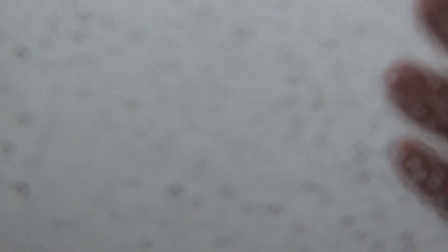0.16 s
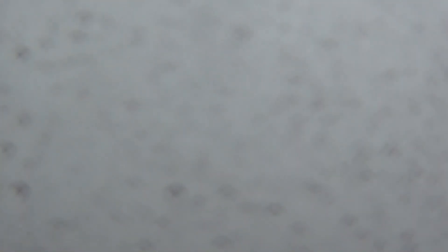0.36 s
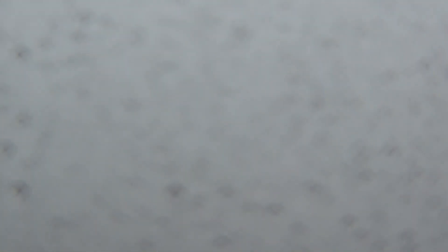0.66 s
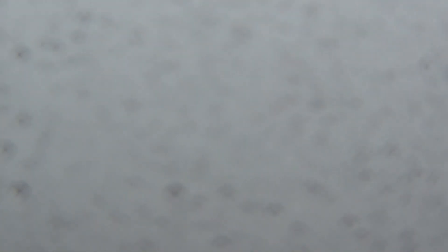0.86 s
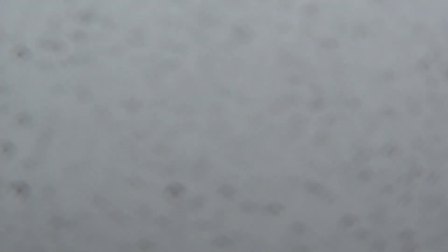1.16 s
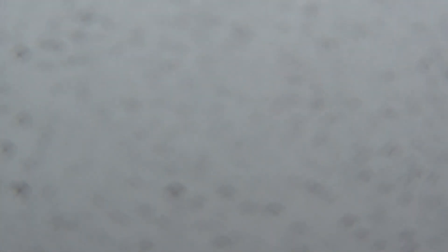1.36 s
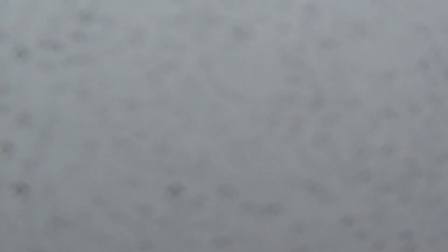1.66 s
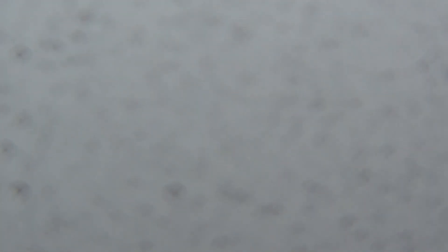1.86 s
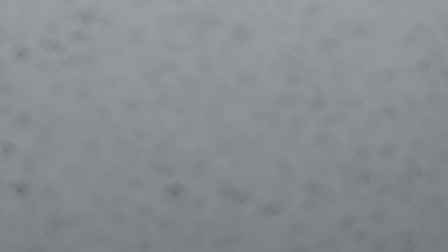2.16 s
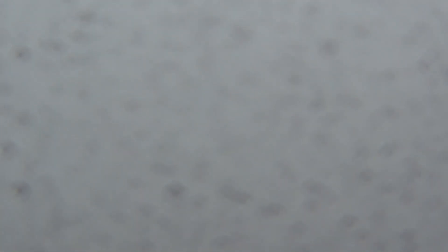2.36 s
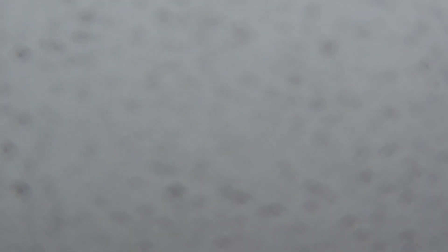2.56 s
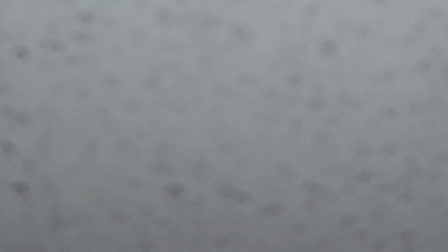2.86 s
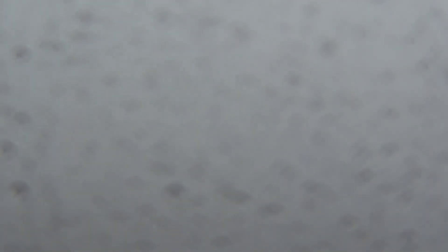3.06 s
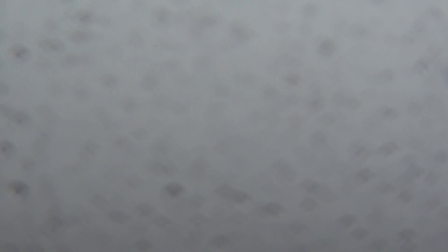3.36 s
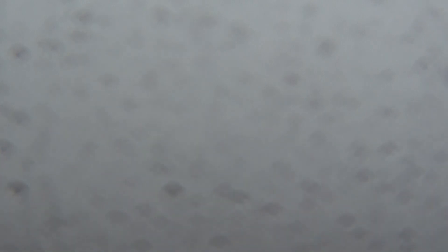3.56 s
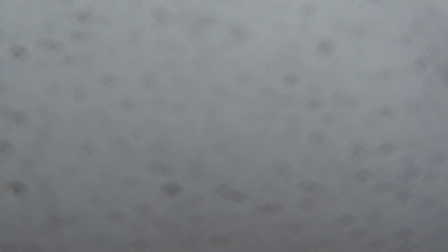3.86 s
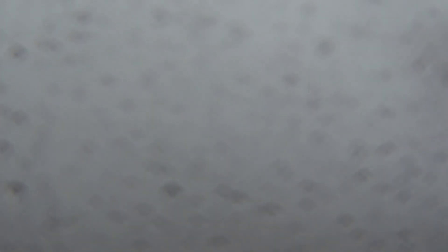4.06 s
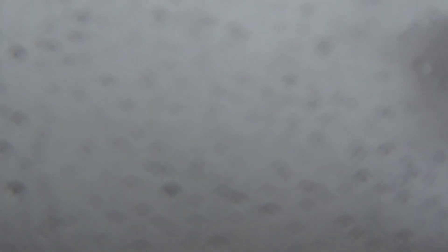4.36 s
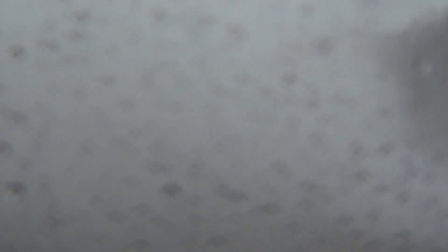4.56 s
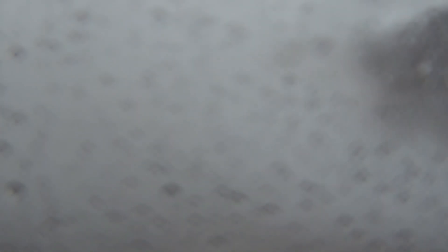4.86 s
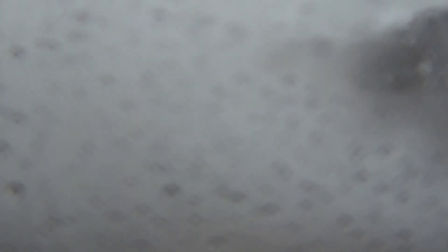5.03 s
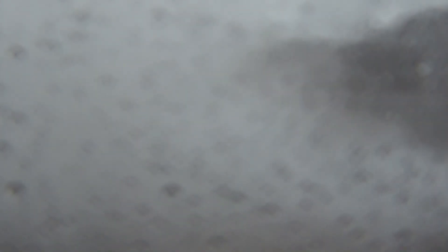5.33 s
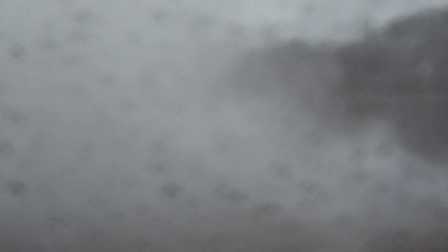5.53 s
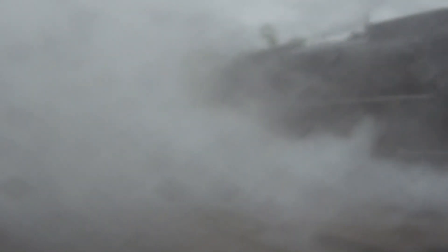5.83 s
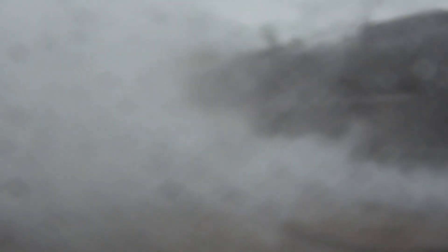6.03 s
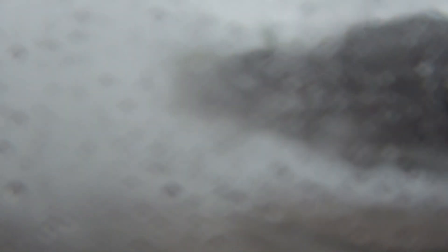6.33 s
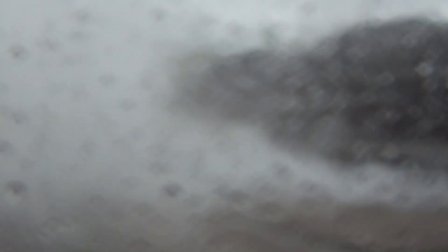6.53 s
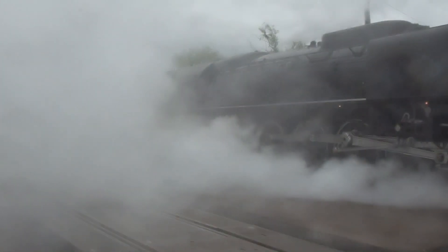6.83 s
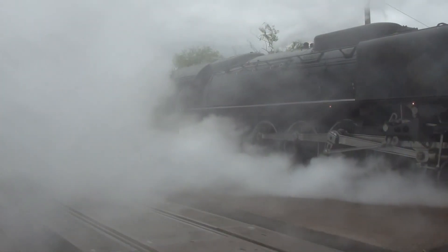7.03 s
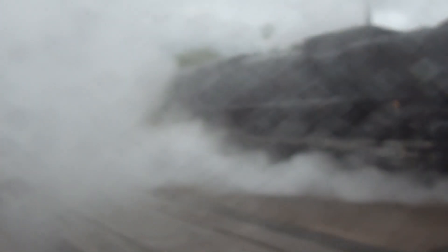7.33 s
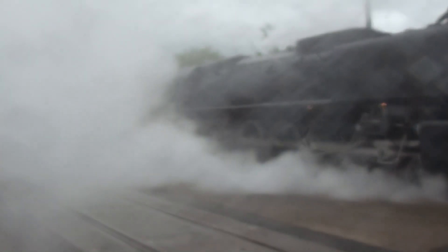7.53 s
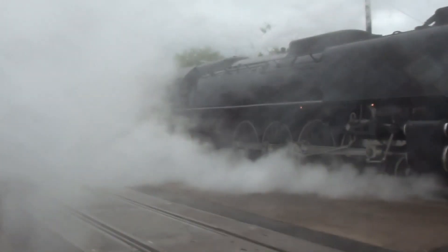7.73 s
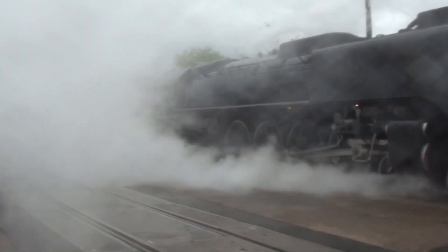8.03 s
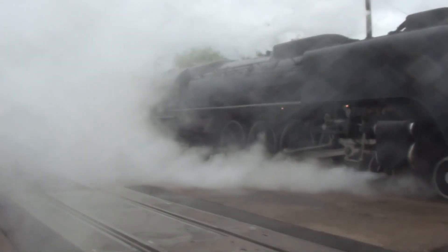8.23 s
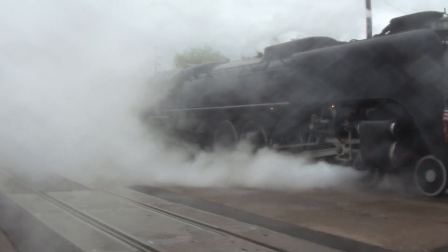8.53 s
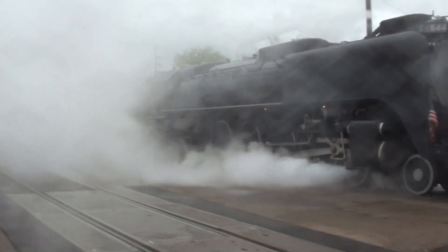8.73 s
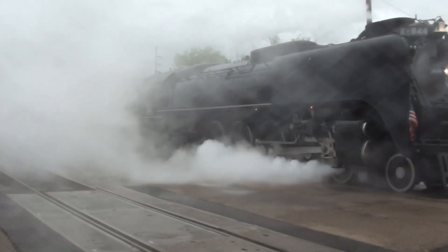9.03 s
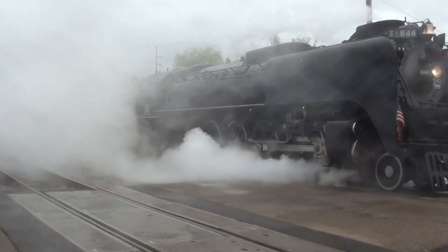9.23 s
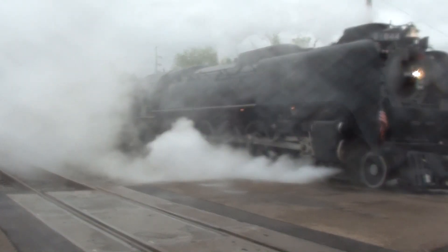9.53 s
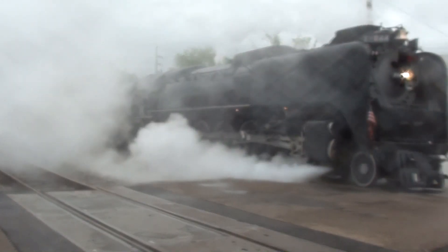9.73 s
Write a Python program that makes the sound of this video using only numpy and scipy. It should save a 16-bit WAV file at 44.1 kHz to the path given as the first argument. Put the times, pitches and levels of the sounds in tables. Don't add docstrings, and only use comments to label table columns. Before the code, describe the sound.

A continuous wall of steam hiss, bright and slightly hollow from ground reflections, fills a close outdoor stereo microphone. It snaps off for a moment, returns sharply, then weaker, and sags away. In the quiet gap a high whine swells, a small distant bell rings and metal knocks dully over low rumble. Steam swells back, dips once and blows until the end.

```python
import sys
import numpy as np
from scipy import signal
from scipy.fft import rfft, irfft
from scipy.io import wavfile
from scipy.ndimage import uniform_filter1d

SR = 44100
rng = np.random.default_rng(int(sys.argv[2]) if len(sys.argv) > 2 else 0)


def output_pcm(signal):
    pcm = np.clip(np.atleast_2d(signal).T, -1, 1) * 32767
    wavfile.write(sys.argv[1], SR, np.round(pcm).astype(np.int16))


def linear_from_db(decibels):
    return 10 ** (np.asarray(decibels, float) / 20)


N = 436149
SIZE, HOP = 1024, 256


def evened(x):
    return x / np.sqrt(np.mean(x ** 2) + 1e-20)


def read(points, hz):
    f, value = np.transpose(points)
    return np.interp(np.log(hz + 1), np.log(f + 1), value)


def curve(rows, t, column):
    rows = np.array(rows)
    return np.interp(t, rows[:, 0], rows[:, column])


def swells(rows, t):
    return sum(linear_from_db(2 * db) * np.exp(-((t - s) / length) ** 2) for s, db, length in rows)


def bump(hz, centre_hz, width_hz, db):
    return linear_from_db(2 * db / (1 + ((hz - centre_hz) / width_hz) ** 2))


def eddies(shape, frames_count, bins_count):
    field = uniform_filter1d(rng.standard_normal(shape), frames_count, 0)
    return evened(uniform_filter1d(field, bins_count, 1))


def tone(hz):
    return np.sqrt(2) * np.sin(2 * np.pi * np.cumsum(hz) / SR)


def noise(gain, same, pan_db):
    a, b, c, d = rng.standard_normal((4,) + gain.shape)
    same = np.clip(same, 0, 1)
    side = linear_from_db(pan_db / 2)
    left = a + 1j * b
    right = same * left + np.sqrt(1 - same ** 2) * (c + 1j * d)
    gain = gain * 2 / np.sqrt(side ** 2 + side ** -2 + 2 * same)
    z = np.array([gain * side * left, gain / side * right])
    return signal.istft(z.transpose(0, 2, 1), nperseg=SIZE, noverlap=SIZE - HOP)[1][:, :N]


# time_s, nearness_db, left_right_db
PASS = [(0, 0, -.3), (1.1, 0, -.2), (1.6, -1, 1), (2.05, -.5, .3), (2.3, 0, -1), (2.73, 2.5, -4),
        (3.2, 1.5, -4.8), (3.6, 0, -5.3), (4.38, 2.5, -4), (5.02, -1.5, -3.3), (5.12, .3, -3.2),
        (6.2, 0, -2.5), (7.0, 0, -.5), (7.8, 0, 1), (8.1, 0, -1), (9.89, 0, -.5)]
# time_s, hiss_db, fire_roar_db
LEAKS = [(3.4, -42, -66), (4.74, -39.5, -66), (4.83, -41.5, -67), (5.9, -52, -70), (6.17, -56, -64),
         (6.5, -53.5, -69), (7.04, -55, -67), (7.6, -52.5, -65), (7.88, -53, -62), (9.2, -38.5, -59),
         (9.7, -38.5, -65)]
# time_s, roar_db
CLOUD_ROAR = [(0, -46), (1.4, -46), (1.8, -44), (2.3, -47.5), (2.8, -48), (3.2, -56), (3.7, -56),
              (4.45, -54), (4.6, -68), (6.0, -72), (8.2, -55), (8.45, -64), (9.5, -59), (9.89, -62)]
# centre_s, roar_db, length_s
GUSTS = [(.06, -39, .06), (1.1, -47, .04), (1.65, -43, .06), (7.8, -62, .15), (9.14, -51, .04),
         (9.28, -54, .05)]
# freq_hz, density_db_per_hz
ROAR = [(15, -50), (25, -25), (97, -8), (162, -1), (194, -1.5), (247, -2), (289, 1), (380, -9), (490, -39),
        (840, -120)]
# freq_hz, share
AIM = [(500, 0.031), (1200, .25), (2200, 0.82), (7200, 1.23), (9500, 0.87), (13000, 0.0051)]
SWAY_DB = .3


def steam():
    t = np.arange(N // HOP + 5) * HOP / SR
    hz = np.fft.rfftfreq(SIZE, 1 / SR)
    power, body_db, fizz_db = jets(t, hz)
    blast, opening, slack_db = valves(t)
    dulling = .35
    body_db = body_db - dulling * slack_db[:, None]

    sway_db = SWAY_DB * eddies((len(t), 1), frames_count=14, bins_count=1)[:, 0]
    flow = blast * linear_from_db(2 * curve(PASS, t, column=1) + 2 * sway_db)
    flow = flow + linear_from_db(2 * curve(LEAKS, t, column=1))
    low = opening * linear_from_db(2 * curve(CLOUD_ROAR, t, column=1))
    low = low + linear_from_db(2 * curve(LEAKS, t, column=2)) + swells(GUSTS, t)

    power = balanced(surroundings(power, t, hz), body_db, fizz_db, hz)
    roar = linear_from_db(2 * read(ROAR, hz))
    roar = roar / roar[(hz > 60) & (hz < 330)].sum()
    power = power + roar * (low / flow)[:, None]

    ripples_db = 2.3 * eddies(power.shape, frames_count=60, bins_count=2) / (1 + hz / 6000)
    billows_db = 0.7 * eddies(power.shape, frames_count=16, bins_count=12)
    flutter_db = 0.84 * eddies(power.shape, frames_count=2, bins_count=200) * (hz / 9000) ** 2
    gain = np.sqrt(power) * linear_from_db(ripples_db + billows_db + flutter_db)
    pan_db = curve(PASS, t, column=2)[:, None] * read(AIM, hz)
    hiss = noise(gain, likeness(t, hz), pan_db)
    hiss = hiss * np.sqrt(power.sum(1).mean() / np.mean(hiss.mean(0) ** 2))
    return hiss * np.interp(np.arange(N) / SR, t, np.sqrt(flow))


# freq_hz, density_db_per_hz
CLOUD = [(330, -14.5), (450, -18.5), (650, -4), (900, -0.3), (1150, -5.5), (1500, -1.5), (2200, -0.1),
         (3200, -2), (4500, -2.3), (5800, -2), (7200, -1.2), (8500, -5.5), (10000, -12.5), (12500, -22)]
NEARING = [(330, -12), (450, -15), (650, -2.5), (900, -5), (1150, -9), (1500, -1.7), (2200, -2.6),
           (3200, -1.9), (4500, -3.5), (5800, -4.1), (7200, -1.5), (8500, -6.7), (10000, -16), (12500, -24)]
NEAR = [(330, -18.9), (450, -15), (650, -6), (900, -6.5), (1150, -6), (1500, -5), (2200, -2.5), (3200, -3),
        (4500, -4.5), (5800, -5), (7200, -2.5), (8500, -8.5), (10000, -19.3), (12500, -26)]
SHARP = [(330, -13.5), (450, -16), (650, -11), (900, -9.5), (1150, -12.5), (1500, -6.5), (2200, -6.6),
         (3200, -3), (4500, -2), (5800, -0.5), (7200, 1.5), (8500, -3.5), (10000, -16.1), (12500, -23.5)]
SHARPER = [(330, -13.5), (450, -18), (650, -18.3), (900, -9), (1150, -8.7), (1500, -8.6), (2200, -8.5),
           (3200, -6), (4500, -5.5), (5800, -5), (7200, -0.3), (8500, -5.5), (10000, -14.4), (12500, -27)]
WEAK = [(330, -18), (450, -15), (650, -12), (900, -6), (1150, -5.5), (1500, -6.5), (2200, -6), (3200, -5),
        (4500, -5.5), (5800, -4.5), (7200, 0), (8500, -8.5), (10000, -13.9), (12500, -25.3)]
LEAK = [(330, -5.5), (450, -3.5), (650, -1.5), (900, 2), (1150, -4), (1500, -2.8), (2200, -1), (3200, -2.5),
        (4500, -1), (5800, -2), (7200, 2), (8500, -4.5), (10000, -12.5), (12500, -22)]
RISING = [(190, -51), (330, -20), (847, -0.5), (1020, -11), (1400, -10), (1870, -12.5), (2770, -10),
          (3760, -9.5), (4060, -9), (6800, -7), (12500, -18), (16200, -56), (22000, -120)]
FRONT = [(330, -5.5), (450, -14.5), (650, -11), (900, 0), (1150, -8.5), (1500, -4.5), (2200, -6.5),
         (3200, -3.5), (4500, -3.5), (5800, -6), (7200, -2.2), (8500, -4), (10000, -14), (12500, -21.5)]
LAST = [(330, -7.5), (450, -17.5), (650, -9), (900, -2), (1150, -11.4), (1500, -7), (2200, -8.5),
        (3200, -3.5), (4500, -2), (5800, -3.5), (7200, -2.5), (8500, -3.5), (10000, -10), (12500, -20.5)]
# ground_ms, ground_share, body_ms, body_share, fade_hz
IN_CLOUD = (2.58, .06, .62, .17, 3190)
LOW_DRAIN, LOW_DRAIN_NEAR = (.78, .57, .92, .1, 2150), (.77, .64, 1.5, .21, 3120)
HIGH_DRAIN, HIGH_DRAIN_NEAR = (1.48, .32, .78, .32, 3020), (1.42, .51, .69, .02, 1710)
FAR_DRAIN, LEAK_SIDE = (.59, .45, 1.44, .35, 2700), (1.42, .27, .72, .23, 1900)
AHEAD_RISING, AHEAD = (1.43, .3, 1.74, .1, 4500), (1.43, .63, 1.74, .11, 3600)
LEAK_AHEAD, AHEAD_LAST = (1.43, .45, 1.74, .1, 3000), (1.42, .55, 1.74, .21, 4600)
# takeover_s, over_s, colour, echoes, body_db, fizz_db (both over the hiss)
TURNS = [(-1, .1, CLOUD, IN_CLOUD, -4.2, -12), (1.4, .3, CLOUD, IN_CLOUD, -2, -12.5),
         (2.2, .4, NEARING, LOW_DRAIN, -1, -12), (2.75, .3, NEAR, LOW_DRAIN_NEAR, .2, -14.5),
         (3.15, .15, NEAR, LOW_DRAIN_NEAR, -1.3, -15.5), (3.36, .06, LEAK, LEAK_SIDE, -1.5, -17),
         (3.5, .04, SHARP, HIGH_DRAIN, -5.3, -16), (4.05, .4, SHARPER, HIGH_DRAIN_NEAR, -7.8, -15),
         (4.75, .06, LEAK, LEAK_SIDE, -3, -15), (4.88, .05, WEAK, FAR_DRAIN, -6.3, -14.5),
         (5.2, .08, WEAK, FAR_DRAIN, -5.3, -14), (6.13, .08, LEAK, LEAK_SIDE, .6, -8),
         (7.9, .1, RISING, AHEAD_RISING, 0, -13), (8.27, .15, FRONT, AHEAD, -5, -9.5),
         (9.12, .05, WEAK, LEAK_AHEAD, 1.2, -14), (9.32, .05, LAST, AHEAD_LAST, -3.3, -11.5)]


def jets(t, hz):
    power = np.zeros((len(t), len(hz)))
    body_db, fizz_db = np.zeros((2, len(t), 1))
    share = [np.clip((t - s) / over + .5, 0, 1) for s, over, *_ in TURNS] + [0 * t]
    for k, (_, _, colour, paths, full_db, top_db) in enumerate(TURNS):
        ground_ms, ground, body_ms, body, fade_hz = paths
        loss = 1 / (1 + (hz / fade_hz) ** 2)
        echoes = ground * np.exp(-2e-3j * np.pi * hz * ground_ms)
        echoes = echoes + body * np.exp(-2e-3j * np.pi * hz * body_ms)
        comb = abs(1 + loss * echoes) ** 2
        jet = linear_from_db(2 * read(colour, hz)) * comb * np.clip((hz - 280) / 120, 0, 1)
        on = share[k] > share[k + 1]
        weight = (share[k] - share[k + 1])[on, None]
        power[on] += weight * jet / jet[(hz > 4300) & (hz < 9000)].sum()
        body_db[on] += weight * full_db
        fizz_db[on] += weight * top_db
    return power, body_db, fizz_db


# half_open_s, rise_s, steam_db, half_shut_s, sag_db (before shutting)
BLASTS = [
    (-1, .02, -24.3, 3.305, -4),
    (3.512, .008, -21.6, 4.695, -6),
    (4.915, .018, -30.3, 6.125, -15),
    (8.29, .07, -22.7, 9.087, -4),
    (9.33, .011, -23.5, 12, -1),
]
FILL_DB, FILL_S = -4, .08
SHUT_S, SAG_S = .013, .2


def valves(t):
    power, opening, slack_db = np.zeros((3, len(t)))
    for start, rise, db, end, sag_db in BLASTS:
        opened = .5 + .5 * np.tanh((t - start) / rise / 2)
        opened = opened * (.5 - .5 * np.tanh((t - end) / SHUT_S / 2))
        lost_db = FILL_DB * np.exp(-np.maximum(t - start, 0) / FILL_S)
        lost_db = lost_db + sag_db * np.exp(np.minimum(t - end, 0) / SAG_S)
        power += opened * linear_from_db(2 * (db + lost_db))
        opening += opened
        slack_db += opened * lost_db
    return power, opening, slack_db


# from_s, to_s, freq_hz, width_hz, gain_db
RINGS = [(2.28, 2.65, 1480, 45, 5), (2.65, 2.97, 1270, 35, 7), (2.97, 3.25, 1330, 35, 7.5),
         (3.25, 3.36, 1360, 40, 12), (3.1, 3.4, 1550, 120, -3), (3.1, 3.4, 2900, 200, -2.5),
         (6.3, 7.2, 1750, 130, -2), (1.69, 1.75, 800, 110, 4), (6.2, 7.7, 3000, 300, -1.5),
         (9.35, 10.2, 1050, 50, 3), (9.35, 10.2, 1250, 60, -4), (9.35, 10.2, 1560, 160, 3),
         (7.75, 8.2, 620, 80, -4), (7.75, 8.25, 1430, 80, -3.5), (4.0, 4.6, 730, 60, -3),
         (5.13, 5.18, 1500, 300, -3), (.65, .85, 700, 80, 4), (-1, .25, 600, 70, 5),
         (1.45, 1.75, 1100, 150, 2.5), (.65, 1, 3100, 500, 3), (9.1, 9.5, 2150, 200, 3),
         (2.7, 3.05, 2650, 150, 3.5), (3.2, 3.5, 410, 180, -5), (2.7, 3.36, 1140, 60, -3),
         (8.2, 9.89, 1900, 52, -3), (8.2, 8.9, 1210, 63, -2), (5.95, 6.2, 520, 200, 7),
         (5.18, 5.7, 1500, 250, 3), (4.9, 5.9, 3550, 200, -2.5), (6.2, 8.1, 400, 100, 3),
         (2.5, 2.78, 4100, 160, 2), (2.78, 3.25, 3750, 120, 4), (2.85, 3.05, 2400, 100, 3),
         (3.7, 4.5, 900, 45, 2), (3.45, 4.75, 1350, 60, 4), (8.27, 9.35, 1460, 90, 6),
         (8.2, 9.89, 4300, 230, -4), (8.2, 9.6, 800, 90, 3), (8.2, 9.89, 2940, 80, 3),
         (8.2, 12, 3480, 72, 3), (8.8, 10.2, 2100, 50, 4), (1.55, 1.8, 167, 16, 6)]
# from_s, to_s, freq_hz, width_hz, gain_db
MORE_RINGS = [(2.7, 3.2, 4260, 90, 4), (2.7, 3.2, 3560, 80, 2), (2.7, 3.3, 1050, 60, 2),
              (2.8, 2.95, 1550, 50, 3), (4.76, 4.87, 500, 500, -4), (4.87, 4.93, 900, 800, 4),
              (4.69, 4.75, 1500, 700, 3), (5.4, 5.85, 2000, 1500, 1.5), (5.6, 5.9, 700, 250, 2.5),
              (9.05, 9.45, 1400, 300, 2), (9.45, 10.2, 700, 150, -2), (8.3, 9.05, 4600, 300, -1.5)]


def surroundings(power, t, hz):
    power = power * bump(hz, 1002, 63, -1)
    for start, end, centre_hz, width_hz, db in RINGS + MORE_RINGS:
        power[(t > start) & (t < end)] *= bump(hz, centre_hz, width_hz, db)
    return power


def balanced(power, body_db, fizz_db, hz):
    body = linear_from_db(2 * body_db) / power[:, (hz > 500) & (hz < 3600)].sum(1, keepdims=True)
    fizz = linear_from_db(2 * fizz_db) / power[:, hz > 9500].sum(1, keepdims=True)
    below = np.clip((4600 - hz) / 1500, 0, 1)
    above = np.clip((hz - 8500) / 1500, 0, 1)
    return power * body ** below * fizz ** above


LIKENESS_HZ = (300, 650, 1050, 1400, 2200, 6000, 8300, 10000)
# time_s, share at each LIKENESS_HZ
LIKENESS = [(2.0, .78, .93, .94, .97, .93, .89, .94, 1), (2.4, .68, .72, .86, .94, .85, .79, .8, .9),
            (2.9, .68, .74, .86, .95, .85, .75, .52, .36), (3.9, .7, .74, .87, .94, .87, .78, .57, .38),
            (4.3, .72, .74, .9, .96, .9, .85, .72, .7), (4.7, .8, .8, .92, .97, .92, .9, .82, .8),
            (5.0, .98, .92, .94, .975, .97, .99, .94, .82), (6.1, .975, .94, .95, .98, .96, .99, .96, .92),
            (6.3, .965, .95, .94, .94, .91, .96, .97, 1), (7.8, .97, .96, .95, .94, .91, .96, .98, 1),
            (8.1, .975, .98, .98, .99, .98, .97, .96, .99),
            (9.89, .975, .975, .985, .99, .99, .98, .975, .995)]


def likeness(t, hz):
    bands = np.array([read(list(zip(LIKENESS_HZ, one)), hz) for one in np.eye(len(LIKENESS_HZ))])
    columns = range(1, len(LIKENESS_HZ) + 1)
    same = np.transpose([curve(LIKENESS, t, column=k) for k in columns]) @ bands
    return np.minimum(same, np.interp(hz, (8000, 9600), (.985, 1)))


# centre_s, level_db, length_s
TURBINE = [(6.05, -53, .15), (6.5, -55, .1), (6.8, -52, .2), (7.1, -49, .13), (7.5, -51, .1),
           (7.7, -47.5, .11), (7.95, -48, .05), (8.08, -48, .06), (8.25, -48, .1), (9.25, -45, .3)]
# freq_hz, level_db
WHISTLES = [(985, -74.5), (1502, -72), (2099, -73), (2541, -74), (2686, -73), (3930, -72), (2428, -73),
            (2601, -71), (4109, -73), (4215, -73), (4393, -71.5), (4509, -70.5), (5723, -69.5), (6705, -72),
            (7399, -73), (7466, -70.5), (7572, -72), (8324, -66.5), (8430, -76), (10930, -81), (11330, -83)]
# centre_s, level_db, length_s
SINGING = [(6.36, -63, .1), (7.27, -57, .16), (7.8, -58, .08), (8.2, -63, .3), (9.4, -63, .5)]
# centre_s, level_db, length_s
GEAR_SWELLS = [(6.3, -68, .2), (6.9, -62.5, .17), (7.25, -64.5, .13), (7.67, -61, .07), (7.9, -61.5, .2),
               (9.25, -58, .3)]
# centre_s, level_db, length_s
HUM = [(6.15, -75, .12), (6.62, -73, .08), (7.22, -71, .1), (7.6, -72, .12)]
# time_s, gain_db
STEAM_VEIL = [(2.5, -20), (3.4, -8), (5.5, -7), (6.05, 0), (8.1, 0), (8.45, -7), (9.89, -6)]
BLADE_HZ, BLADE_DB, BLADE_SWIM_DB = 4161.8, -55.5, 1.1
SINGING_HZ, SINGING_WAVER_HZ, SINGING_DB = 7515, 12, -74
SECOND_HZ, SECOND_DB = 3760, -72
HUM_HZ = (129.2, 158)
PORT_LAG = .3


def whines():
    t = np.arange(N) / SR
    swim = eddies((N // HOP + 1, len(WHISTLES) + 2), frames_count=30, bins_count=1)
    swim = np.repeat(swim, HOP, 0)[:N].T
    quick = eddies((N // HOP + 1, 1), frames_count=8, bins_count=1)[:, 0]
    quick = np.interp(t, np.arange(len(quick)) * HOP / SR, quick)

    swell_db = 10 * np.log10(linear_from_db(2 * BLADE_DB) + swells(TURBINE, t))
    blades = linear_from_db(swell_db + BLADE_SWIM_DB * quick) * tone(np.full(N, BLADE_HZ))
    singing = np.sqrt(linear_from_db(2 * SINGING_DB) + swells(SINGING, t))
    out = singing * tone(SINGING_HZ + SINGING_WAVER_HZ * swim[-1])
    for (hz, db), drift in zip(WHISTLES, swim):
        line_db = db - .5 + 1.8 * drift + .6 * (swell_db + 51)
        out += linear_from_db(line_db) * np.sqrt(2) * np.sin(2 * np.pi * hz * t)
    second = np.sqrt(linear_from_db(2 * SECOND_DB) + swells(GEAR_SWELLS, t))
    out += second * linear_from_db(1.5 * swim[-2]) * tone(np.full(N, SECOND_HZ))
    dynamo = tone(HUM_HZ[0] + 1.5 * swim[0]) + .6 * tone(HUM_HZ[1] + 3 * swim[1])
    out += np.sqrt(swells(HUM, t)) * dynamo

    late = PORT_LAG * np.roll(blades, 1) + (1 - PORT_LAG) * blades
    ports = np.array([blades * linear_from_db(1.3), late * linear_from_db(1.2)]) + out
    return ports * linear_from_db(curve(STEAM_VEIL, t, column=1))


# freq_hz, level_db, t60_s
BELL = [
    (1555, 2.5, 1.3),
    (657, -12, 2),
    (2428, -12, .8),
]
# start_s, level_db
STRIKES = [(7.055, -55.5), (7.45, -55.5), (7.89, -56)]


def bell():
    t, out = np.arange(N) / SR, np.zeros(N)
    for s, db in STRIKES:
        since = np.maximum(t - s, 0)
        onset = 1 - np.exp(-since / .012)
        for hz, mode_db, t60 in BELL:
            out += linear_from_db(db + mode_db - 60 * since / t60) * onset * np.sin(2 * np.pi * hz * since)
    return out


# centre_s, level_db, length_s, top_hz
PUFFS = [(.09, -40, .09, 500), (1.14, -50, 0.03, 500), (1.65, -43, .12, 250), (1.71, -36, .08, 3000),
         (7.7, -54, .2, 900), (7.67, -48, .16, 5000), (7.73, -56, .1, 900), (6.62, -57, .08, 1500),
         (6.92, -58, .06, 1200), (8.04, -46, .07, 1000), (9.13, -47, .08, 900)]


def puffs():
    out = np.zeros(N)
    burst = rng.standard_normal((len(PUFFS), SR // 2))
    for (s, db, length, top_hz), air in zip(PUFFS, burst):
        band = signal.butter(2, [110, top_hz], "band", fs=SR, output="sos")
        dull = signal.sosfilt(band, air)
        n = int(length * SR)
        at = max(int(s * SR) - n // 2, 0)
        out[at:at + n] += linear_from_db(db) * evened(dull[-n:]) * np.hanning(n)
    return out


# start_s, peak_db, freq_hz, t60_s
KNOCKS = [(1.137, -31, 130, .05), (1.138, -33, 280, .06), (1.69, -38, 167, .15), (1.698, -30, 290, .12),
          (1.695, -30, 800, .1), (4.715, -50, 170, .12), (4.93, -51, 170, .1), (5.85, -53, 160, .12),
          (5.895, -54, 180, .1), (9.14, -44, 250, .12), (7.565, -53, 170, .12), (7.645, -47, 410, .1),
          (7.645, -45, 655, .12), (7.675, -47, 690, .1), (7.675, -54, 130, .15), (7.68, -49, 255, .12)]
KNOCK_RISE_S = .005


def knocks():
    out = np.zeros(N)
    t = np.arange(SR // 4) / SR
    onset = 1 - np.exp(-t / KNOCK_RISE_S)
    for s, db, hz, t60 in KNOCKS:
        at = int(s * SR)
        out[at:at + len(t)] += linear_from_db(db - 60 * t / t60) * onset * np.sin(-2 * np.pi * hz * t) * 2
    return out


# freq_hz, density_db_per_hz
RUMBLE = [(15, -50), (25, -20), (49, -10), (118, -2), (210, -2), (250, -14), (320, -41), (550, -120)]
# time_s, level_db
RUMBLE_DB = [(5.9, -70), (6.2, -65), (8.9, -66), (9.1, -62), (9.7, -63), (9.89, -70)]


def rumble():
    hz = np.fft.rfftfreq(N, 1 / SR)
    low = irfft(rfft(rng.standard_normal(N)) * linear_from_db(read(RUMBLE, hz)), N)
    return linear_from_db(curve(RUMBLE_DB, np.arange(N) / SR, column=1)) * evened(low)


def scene():
    return steam() + puffs() + knocks() + whines() + bell() + rumble()


def roll_off(x):
    return signal.sosfilt(signal.butter(12, 13670, fs=SR, output="sos"), x)


def record(dry):
    rounded = np.tanh(dry / .75) * .76
    edge = signal.firwin(1023, 12690, window=("kaiser", 9), fs=SR)
    narrow = signal.oaconvolve(rounded, edge[None], "same")
    return roll_off(narrow)


dry = scene()
out = record(dry)
output_pcm(out)
```